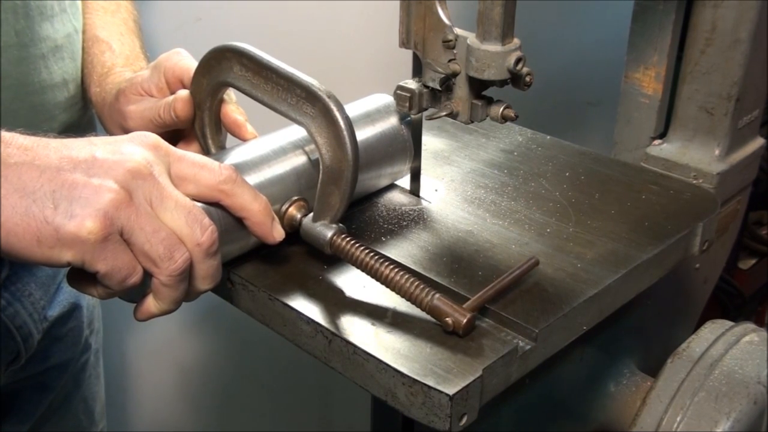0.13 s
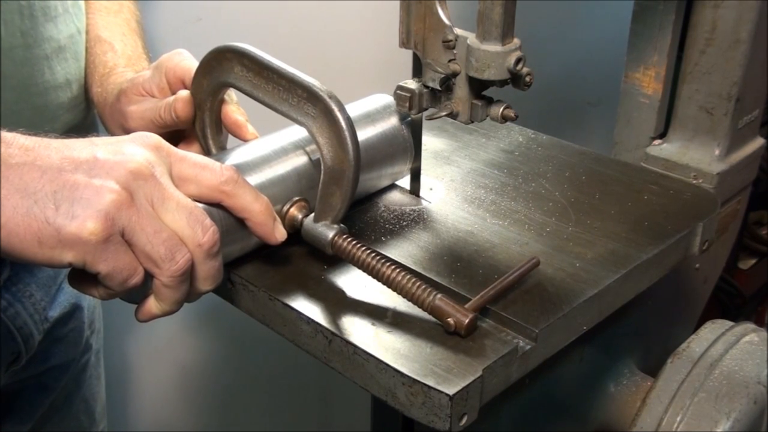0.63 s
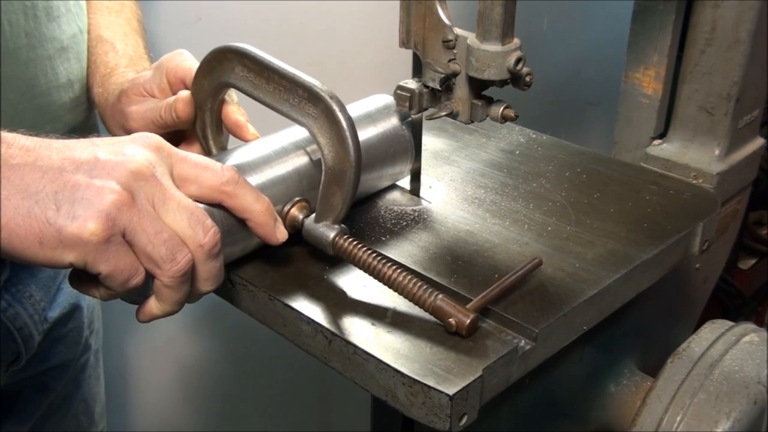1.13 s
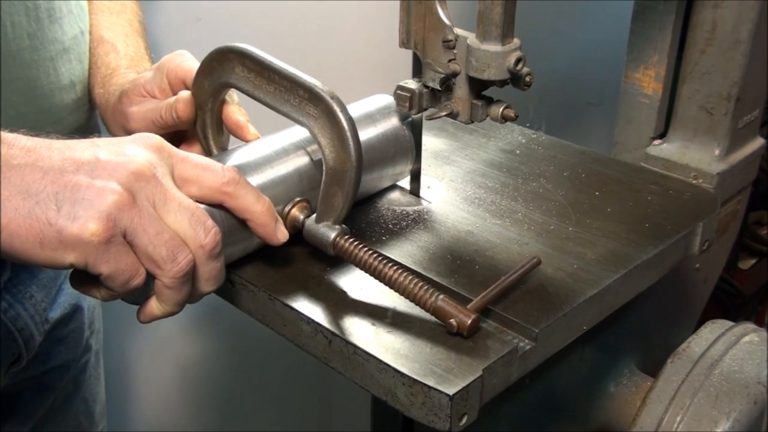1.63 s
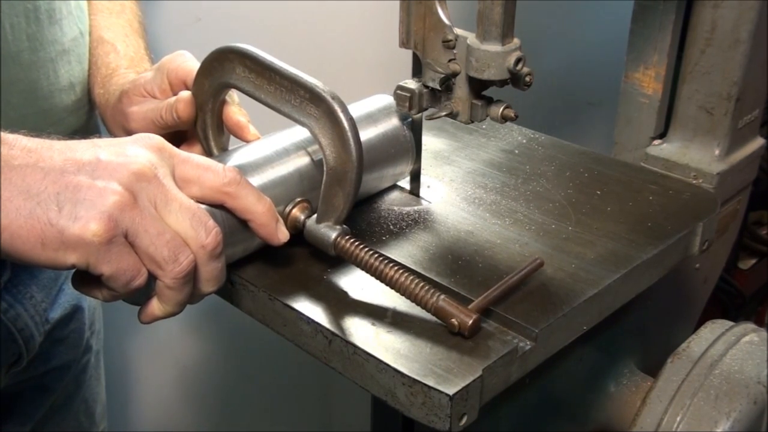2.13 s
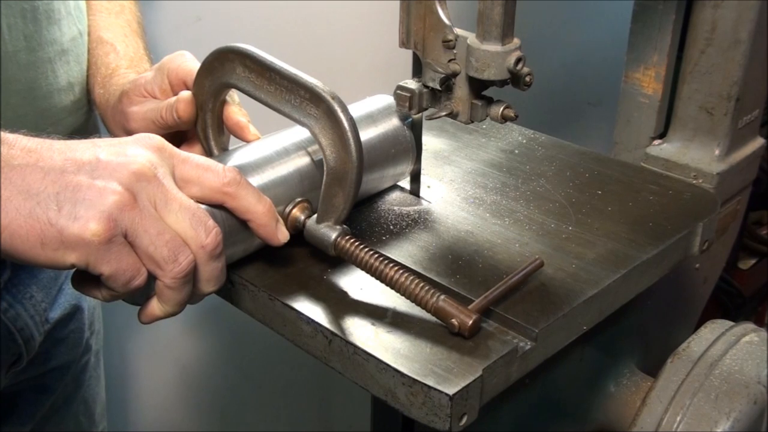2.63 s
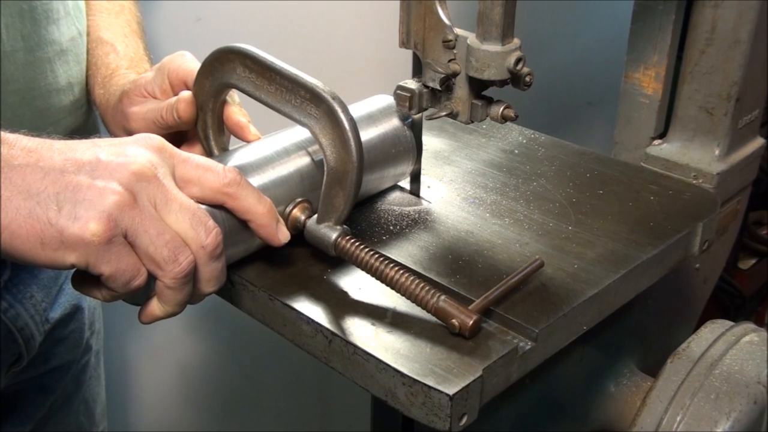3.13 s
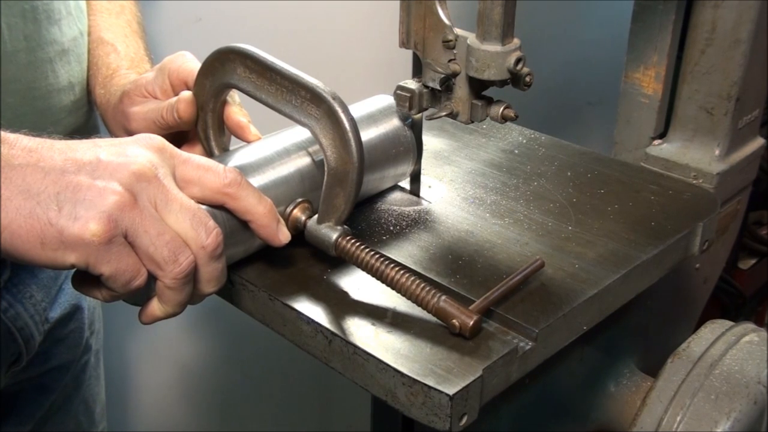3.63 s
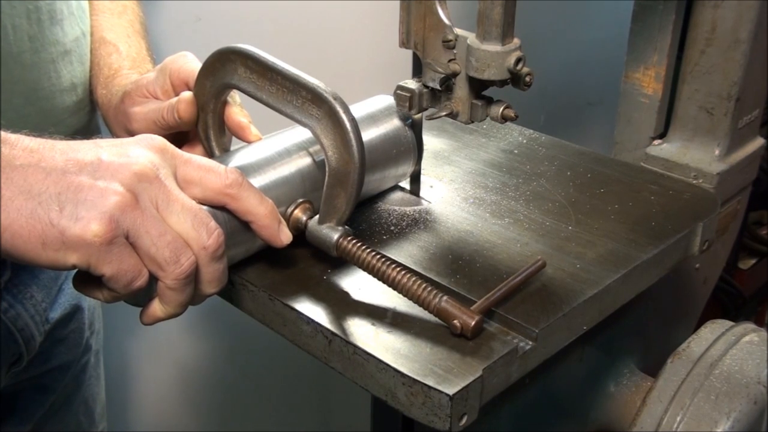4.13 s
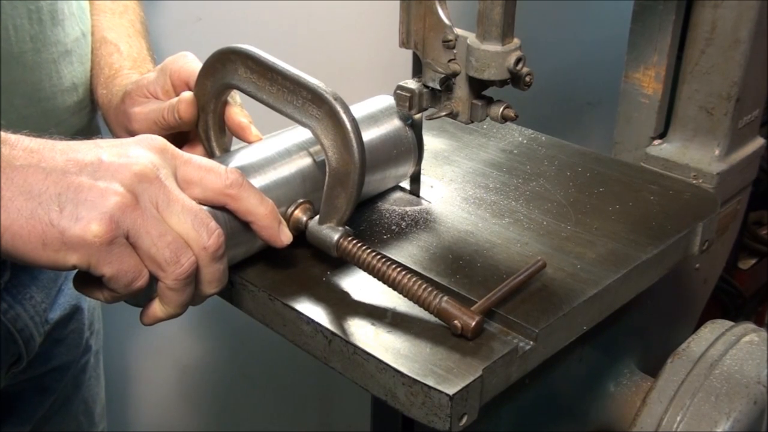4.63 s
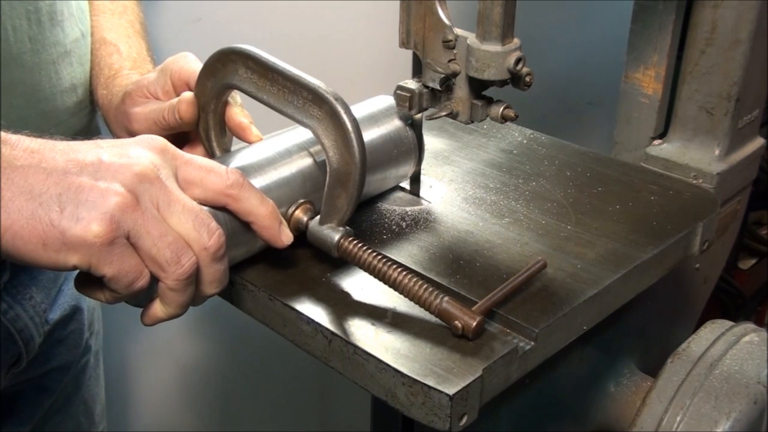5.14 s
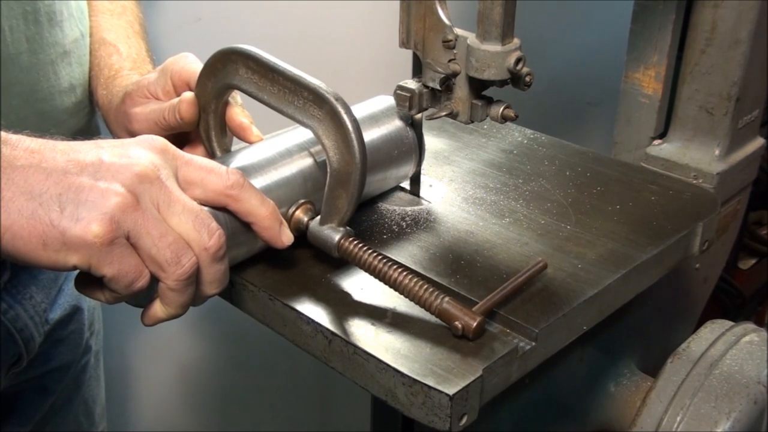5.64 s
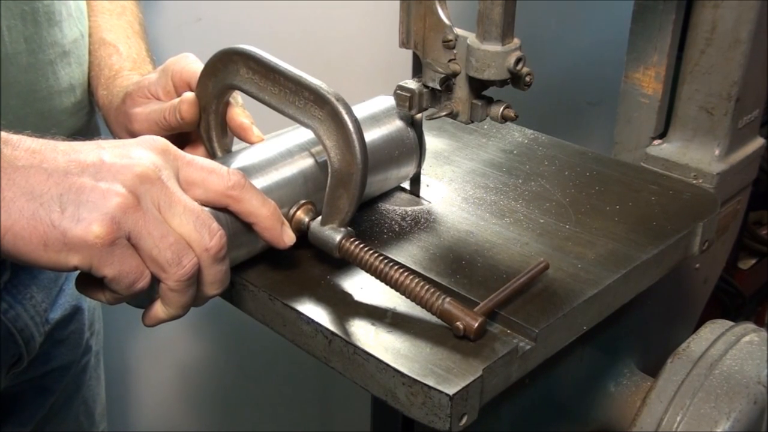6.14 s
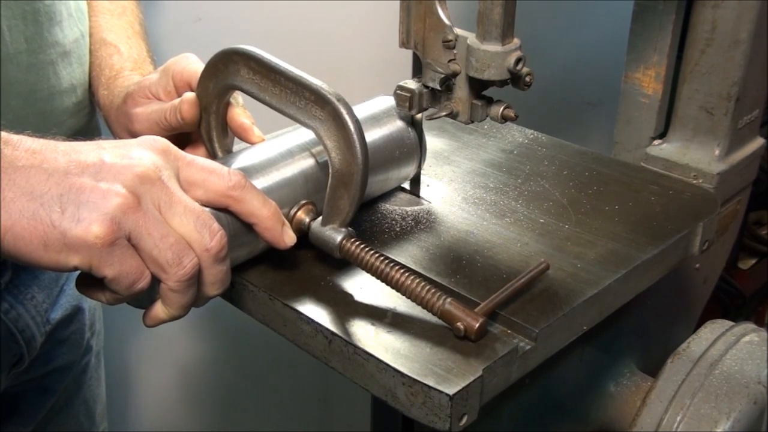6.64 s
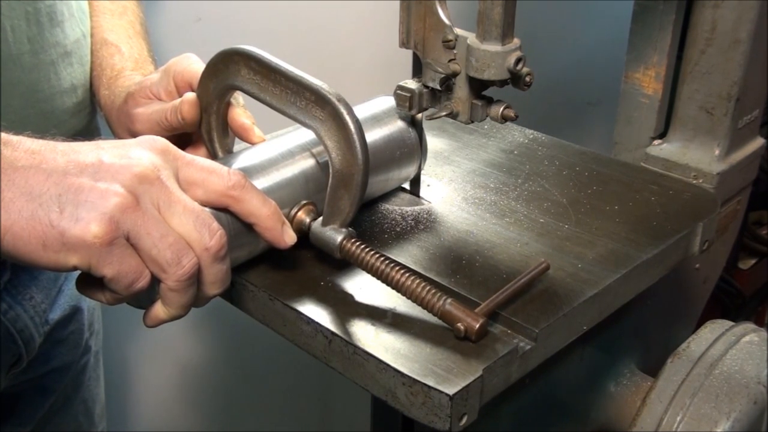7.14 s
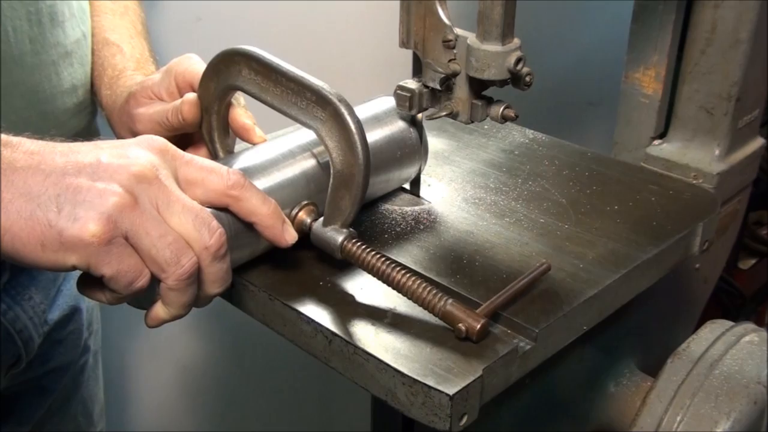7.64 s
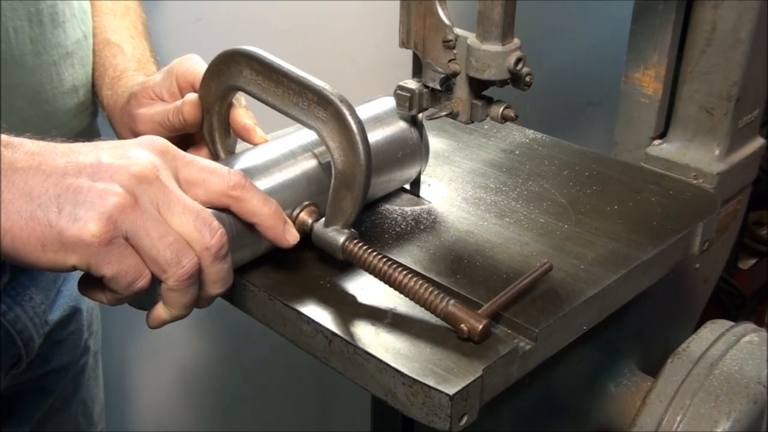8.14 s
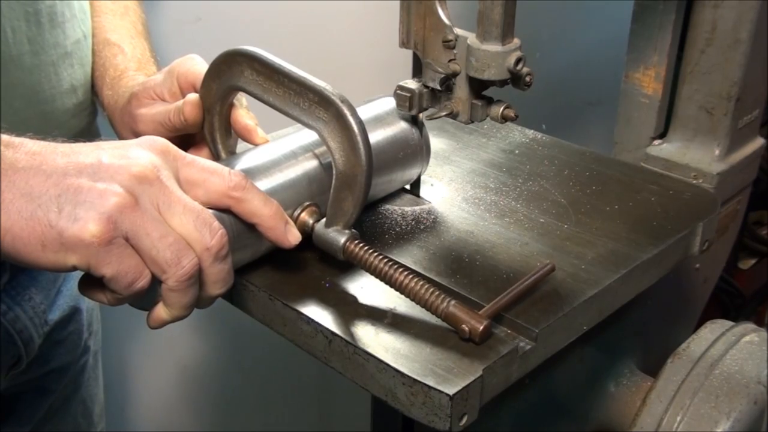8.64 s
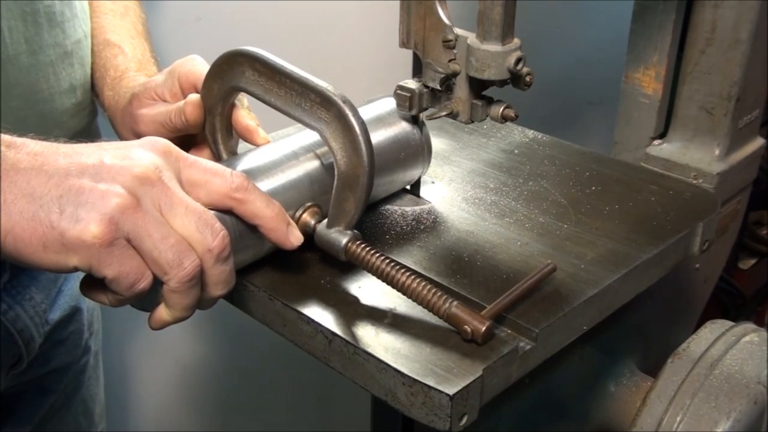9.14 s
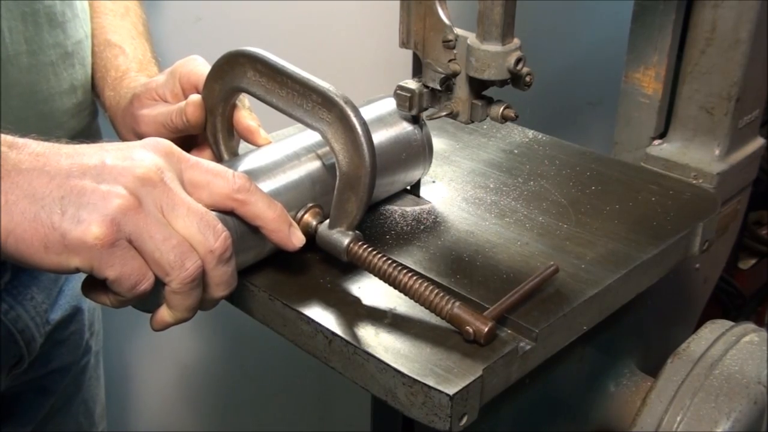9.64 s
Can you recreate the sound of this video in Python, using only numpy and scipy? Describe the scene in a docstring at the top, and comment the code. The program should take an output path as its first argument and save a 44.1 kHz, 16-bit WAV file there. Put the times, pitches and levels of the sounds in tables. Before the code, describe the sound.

Continuous harsh metal sawing: dense sizzling hiss, rapid tooth buzz and wavering metallic whistles that jump between pitches, with brief dips.

```python
"""A vertical bandsaw cuts steadily into a round metal bar held on its iron table in a workshop.
Each tooth gives a short blow and tears off hissing chips; both ring through blade, bar and table.
The blade also chatters: tones at multiples of the tooth rate whistle, squeal and screech in spells.
Echoes spread the saw over two channels, and the motor hums faintly below."""
import sys
import numpy as np
from scipy import signal
from scipy.fft import rfft, irfft
from scipy.io import wavfile
from scipy.ndimage import uniform_filter1d, map_coordinates

SR = 44100
rng = np.random.default_rng(int(sys.argv[2]) if len(sys.argv) > 2 else 0)


def convert_level_to_amplitude(level_db):
    """Map a level in decibels to its linear amplitude factor."""
    exponent = np.asarray(level_db, float) / 20
    return 10 ** exponent


def waveform_to_disk(signal):
    """Save audio, clipped to [-1, 1], as 16-bit WAV at the path in sys.argv[1]."""
    frames = np.transpose(np.atleast_2d(signal))
    scaled = np.clip(frames, -1, 1) * 32767
    samples = np.round(scaled).astype(np.int16)
    wavfile.write(sys.argv[1], SR, samples)


N = 431298
T = np.arange(N) / SR  # time in s
HZ = np.fft.rfftfreq(N, 1 / SR)

TOOTH_HZ, MOTOR_HZ = 357.1, 59.16  # average tooth rate; motor rate
SET_TEETH = 7  # teeth after which the bending pattern (the tooth set) repeats

# The push on the bar over time: t/s, chip hiss level/dB, how deep the teeth bite/dB
FEED_PUSH = [(0.0, -18.5, -3), (0.1, -14, 0.5), (0.35, -16.5, 0.5), (1.3, -15, 2.5), (1.8, -16.5, -4.5),
             (2.17, -15, -1), (2.5, -19, -6.5), (3.5, -18.5, -4.5), (4.05, -14, 1.5), (4.5, -17.5, -3),
             (5.1, -16, 3), (6.0, -15.5, -2), (6.5, -19.5, -5.5), (7.2, -16, 0), (8.15, -16.5, 3),
             (8.85, -17.5, 0.5), (9.3, -16.5, 2), (9.78, -16, 3.5)]


def level(x, db):
    """Scale a sound to an rms (average power) level in dB."""
    return x * convert_level_to_amplitude(db) / np.sqrt(np.mean(x ** 2))


def curves(table):
    """Join the points of each table column into a curve over time."""
    s, *columns = np.transpose(table)
    return [np.interp(T, s, column) for column in columns]


def colour(points):
    """Join (f/Hz, level/dB) points into a dB value for every frequency."""
    hz, db = np.transpose(points)
    return np.interp(np.log(HZ + 1), np.log(hz), db)


def shape(x, gain):
    """Filter a sound by a gain for every frequency."""
    return irfft(rfft(x) * gain, N)


def above(hz):
    """Share of each frequency that lies over a crossover."""
    return 1 / (1 + (hz / (HZ + 1)) ** 8)


def walk(rate):
    """Smooth random curve with a new value rate times a second; its spread is near 1."""
    coarse = T[::32]
    values = rng.standard_normal(4096)
    smooth = map_coordinates(values, [rate * coarse], order=3, mode="wrap")
    return np.interp(T, coarse, smooth)


def phase(hz):
    """Add up a frequency over time into a running phase in radians."""
    return 2 * np.pi * np.cumsum(hz) / SR


def cut(turn, eased_db):
    """Blows and chips ring the steel; hiss and bar follow the push, the heavy table rumbles on."""
    bar_hz, table_hz, sizzle_hz = 3700, 1000, 11000  # crossovers between the layers
    hiss_db, bite_db = curves(FEED_PUSH)
    # start level/dB + dB gained per s as the cut deepens + dB per dB of bite
    bar_db = -7.5 + 0.61 * T + 0.43 * bite_db
    table_db = -37 + 0.32 * T + 0.67 * bite_db
    sizzle_db = -2.2 + 0.27 * T - 0.23 * bite_db
    steel = ring(level(chips(turn), 0) + level(teeth(turn), -14.5))
    hiss = level(shape(steel, above(bar_hz)), 1.96)
    sizzle = shape(hiss, above(sizzle_hz))
    bar = level(shape(steel, above(table_hz) - above(bar_hz)), 0)
    table = level(shape(steel, 1 - above(table_hz)), 0)
    pushed = hiss + (convert_level_to_amplitude(sizzle_db) - 1) * sizzle + convert_level_to_amplitude(bar_db) * bar
    return convert_level_to_amplitude(hiss_db - eased_db) * pushed + convert_level_to_amplitude(table_db) * table


def teeth(turn):
    """One blow per tooth; the set of the teeth repeats, and each bite differs a little."""
    # Tone colour of a blow: f/Hz, relative level/dB
    blow_colour = [(200, -41), (720, -23.5), (1500, -4), (2500, -11), (4000, -18), (6000, -23), (9000, -7),
                   (14000, -52)]
    tooth = (turn // (2 * np.pi)).astype(int)
    at = np.flatnonzero(np.diff(tooth)) + 1
    bent_db = 1.7 * np.cos(2 * np.pi * tooth[at] / SET_TEETH)
    uneven_db = 2.1 * rng.standard_normal(4096)
    blows = np.zeros(N)
    blows[at] = convert_level_to_amplitude(bent_db + uneven_db[:len(at)])
    return shape(blows, convert_level_to_amplitude(colour(blow_colour)))


def chips(turn):
    """Chips tear off as noise that pulses with tooth, tooth set and motor, and flutters."""
    # Tone colour of the chip noise: f/Hz, relative level per Hz/dB
    hiss_colour = [(40, -53), (150, -33), (300, -22.5), (520, -21), (800, -21.5), (1200, -10), (2000, -5.5),
                   (2700, -8), (4000, -1), (5600, -5.5), (8500, -4.5), (11000, -9), (16000, -18)]
    pulse = 0.04 * np.cos(turn) + 0.04 * np.cos(turn / SET_TEETH)
    pulse = pulse + 0.03 * np.cos(2 * np.pi * MOTOR_HZ * T)
    flutter_db = 1.1 * walk(14) + 1.05 * walk(45) + 0.62 * walk(250)
    noise = rng.standard_normal(N) * (1 + pulse) * convert_level_to_amplitude(flutter_db)
    return shape(noise, convert_level_to_amplitude(colour(hiss_colour)))


def ring(x):
    """Resonances of blade, bar and table; each swells and fades as the grip on the bar shifts."""
    # Resonances, before their swells: f/Hz, width/Hz, peak over the hiss colour/dB
    resonances = [(420, 145, 6.5), (640.7, 28.5, 17), (924, 35, 7.5), (2340, 24, 6.5), (2459, 7.3, 8),
                  (2913, 63, 5.5), (3622, 16, 7), (3930, 57, 5), (4250, 184, 6), (4680, 42, 11.5),
                  (4895, 79, 12), (5300, 43, 9.5), (5350, 21, 12), (5700, 100, 4.5), (5900, 64, 5),
                  (6340, 310, 6), (7126, 290, 8.5), (7540, 57, 8), (7930, 46, 10), (8540, 240, 7),
                  (8750, 59, 6.5), (9350, 60, 6.5), (9880, 65, 10), (10320, 41, 4.5), (11900, 140, 8),
                  (12600, 80, 5), (13200, 100, 4)]
    out = x
    for hz, width, db in resonances:
        swell_db = 1.87 * walk(1.605) + 2.04 * walk(9)
        rung = signal.lfilter(*signal.iirpeak(hz, hz / width, SR), x)
        out = out + (convert_level_to_amplitude(db) - 1) * convert_level_to_amplitude(swell_db) * rung
    return out


def easing():
    """dB by which the push has slackened, in short dips."""
    # Short easings of the push: start t/s, length/s, depth/dB
    easings = [(2.127, 0.36, 8.5), (2.488, 0.073, 4), (3.113, 0.096, 6), (3.743, 0.16, 3), (4.695, 0.08, 1),
               (5.33, 0.1, 4), (6.214, 0.16, 3), (6.691, 0.11, 0), (6.889, 0.11, 2.5), (7.451, 0.25, 4),
               (7.793, 0.17, 5), (9.406, .13, 9)]
    skew = 1.56  # over 1: the push slackens slowly and returns fast
    eased_db = 0
    for start, length, depth_db in easings:
        progress = np.clip((T - start) / length, 0, 1)
        eased_db = eased_db + depth_db * np.sin(np.pi * progress ** skew)
    return eased_db


def spells(multiple, rest_db):
    """Level of one multiple: each spell catches fast, holds and fades, over a resting level."""
    # Spells in which the blade locks onto one multiple of the tooth rate:
    # start t/s, end t/s, multiple, first level/dB, last level/dB
    locks = [(0.05, 0.38, 14, -29, -20.5), (0.0, 0.528, 5, -16.5, -24.5), (0.056, 1.4, 4, -24, -22),
             (0.85, 1.44, 7, -30, -30), (1.444, 2.126, 4, -20.5, -17), (2.15, 2.336, 4, -18, -28),
             (2.15, 2.25, 5, -27, -33), (2.17, 2.225, 3, -40, -39), (2.455, 3.405, 12, -12.5, -14),
             (2.429, 3.657, 6, -21.5, -22.5), (3.197, 3.54, 7, -36, -46), (3.42, 3.78, 12, -13.5, -23),
             (3.84, 4.202, 5, -15, -22), (3.9, 4.433, 4, -27.5, -30), (4.2, 4.362, 6, -29, -26),
             (4.3, 5.153, 5, -17, -21.5), (4.95, 5.322, 4, -27, -33.5), (5.0, 5.9, 6, -29, -29),
             (5.29, 6.897, 5, -15.5, -17), (6.422, 6.713, 2.5, -50, -41), (6.7, 7.139, 4, -30.5, -35),
             (6.7, 7.46, 7, -35, -37.5), (6.946, 8.549, 5, -17.5, -21), (7.2, 7.395, 9, -21, -25.5),
             (7.2, 8.503, 3, -35, -31.5), (8.55, 9.78, 3, -27.5, -25), (7.454, 7.66, 6, -29, -24.5),
             (7.92, 8.04, 6, -19, -34), (8.03, 9.161, 4, -27, -29), (8.398, 9.26, 7, -33, -32),
             (8.6, 8.95, 6, -28, -26), (9.302, 9.7, 6, -23.5, -20.5), (9.514, 9.572, 12, -4, -19),
             (9.525, 9.6, 9, -18, -21), (9.7, 9.78, 5, -24, -16)]
    catch_db_per_s, fade_db_per_s = 320, 81
    db = rest_db + 0 * T
    for start, end, locked, first_db, last_db in locks:
        if abs(locked / multiple - 1) < 0.07:
            held_db = np.interp(T, [start, end], [first_db, last_db])
            catch_db = catch_db_per_s * np.maximum(start - T, 0)
            fade_db = fade_db_per_s * np.maximum(T - end, 0)
            db = np.maximum(db, held_db - catch_db - fade_db)
    return db


def chatter(turn):
    """Whistles near multiples of the tooth rate wander, tremble, and beat with tooth set and motor."""
    # One row per whistle: multiple of the tooth rate, level between spells before the bite/dB,
    # pitch wander/Hz, tremble/dB, lower sideband/dB, upper sideband/dB, octave/dB, twelfth/dB
    whistles = [(1, -42, 4.06, 4.5, -35, -7, -14.5, -33), (2.5, -58, 5.65, 9, -26, -11, -30, -30),
                (3, -42, 4.6, 4, -9, -13, -21, -16), (4, -35, 12.9, 3, -12.5, -17, -4.5, -28),
                (5, -27, 5.07, 2, -16, -4, -13, -14), (6, -35.5, 15.87, 3, -9.5, -4, -30, -25),
                (7, -40, 8, 2, -17, -14, -30, -30), (9, -29, 12.18, 3.5, -16.5, -12, -25, -30)]
    # The whistle of multiple 4 sags off the tooth rate under a hard push: t/s, f/Hz
    sag = [(0, 1445), (1.0, 1425), (1.3, 1424), (1.6, 1453), (1.8, 1393), (1.95, 1370), (2.1, 1370),
           (2.2, 1453)]
    (sag_hz,) = curves(sag)
    bite_db = curves(FEED_PUSH)[1]
    out = 0
    for multiple, rest_db, wander_hz, tremble_db, low_db, up_db, octave_db, twelfth_db in whistles:
        db = spells(multiple, rest_db + bite_db)
        swing = phase(sag_hz) if multiple == 4 else multiple * turn
        swing = swing + phase(wander_hz * walk(60))
        upper_phase = swing + turn / SET_TEETH + phase(11 * walk(35))
        upper = convert_level_to_amplitude(up_db + 3.7 * walk(9)) * np.cos(upper_phase)
        lower_phase = swing - phase(MOTOR_HZ + 6 * walk(25))
        lower = convert_level_to_amplitude(low_db + 4.7 * walk(9.9)) * np.cos(lower_phase)
        # the wider the blade swings, the harder it slaps the cut and the stronger its overtones
        slap = convert_level_to_amplitude(1.3 * (db - db.max()) + 2.5 * walk(30))
        overtones = convert_level_to_amplitude(octave_db) * np.cos(2 * swing) + convert_level_to_amplitude(twelfth_db) * np.cos(3 * swing)
        tone = level(np.cos(swing) + upper + lower, 0) + np.sqrt(2) * slap * overtones
        out = out + convert_level_to_amplitude(db + tremble_db * walk(24)) * tone
    return out


def squeal(turn):
    """A cluster of rough, quickly wavering blade tones that throb together."""
    # What rings in a squeal: multiple of the tooth rate, relative level/dB, pitch spread/Hz
    squeal_parts = [(11.82, -7, 22), (12.05, 0, 30), (12.3, -13, 20), (13.8, -11, 22), (14.03, -13, 14),
                    (15.05, -11, 12), (18.05, -11, 40), (20.2, -17, 30), (24.15, -12, 60)]
    db = spells(12, -60)
    throb_db = 3.6 * walk(60) + 0.43 * walk(16)
    cluster = 0
    for multiple, part_db, spread_hz in squeal_parts:
        swing = multiple * turn + phase(spread_hz * walk(160))
        cluster = cluster + convert_level_to_amplitude(part_db + 2.8 * walk(40)) * np.cos(swing)
    return convert_level_to_amplitude(db + throb_db) * level(cluster, 0)


def screech(turn):
    """One broad, fast-wavering blade tone around 14 times the tooth rate."""
    db = spells(14, -60) + 3.0 * walk(59)
    return np.sqrt(2) * convert_level_to_amplitude(db) * np.cos(14 * turn + phase(70 * walk(140)))


def workshop(saw):
    """The saw leans a little right, reaches the two channels out of step, and echoes around it."""
    # Left-right difference under the middle: f/Hz, level/dB
    side_colour = [(60, -30), (110, -39), (200, -32), (380, -17), (700, -17.5), (1290, -12.5), (2380, -10),
                   (4400, -12.5), (8120, -11.5), (15000, -19)]
    # Left minus right: f/Hz, level/dB
    lean_colour = [(60, 0), (110, 0), (200, 0.5), (380, 0.2), (700, -0.5), (1290, -1.8), (2380, -1),
                   (4400, -1.0), (8120, -1.5), (15000, 0.5)]
    echoes = rng.standard_normal(N) * np.exp(-np.log(1000) * T / 0.58)  # falls 60 dB in 0.58 s
    echoes = echoes / np.sqrt(np.sum(echoes ** 2))
    apart = -0.7j + 0.46 * rfft(echoes)  # -j shifts every frequency by a quarter cycle
    side = shape(saw, apart * convert_level_to_amplitude(colour(side_colour)))
    lean = convert_level_to_amplitude(colour(lean_colour) / 2)
    return np.array([shape(saw, lean) + side, shape(saw, 1 / lean) - side])


def motor():
    """Faint hum of steady sine tones whose levels waver slowly."""
    # Hum tones, before the waver: f/Hz, rms level/dB
    hum_tones = [(59.2, -60), (118.4, -61.5)]
    hum = 0
    for hz, db in hum_tones:
        hum = hum + np.sqrt(2) * convert_level_to_amplitude(db + 2 * walk(1.2)) * np.sin(2 * np.pi * hz * T)
    return hum


def scene():
    """The running blade drives cut and tones together; the motor hums equally in both channels."""
    turn = phase(TOOTH_HZ + 0.8 * walk(3) + 1.542 * walk(30))  # one full turn per tooth
    eased_db = easing()
    # whistles and squeal sink with every short easing: dB lost per dB of easing
    whistling = convert_level_to_amplitude(-0.51 * eased_db) * chatter(turn)
    squealing = convert_level_to_amplitude(-1.04 * eased_db) * squeal(turn)
    saw = cut(turn, eased_db) + whistling + squealing + screech(turn)
    return workshop(saw) + motor()


def band_limit(x):
    """A steep low-pass at the top of the band."""
    return signal.sosfilt(signal.butter(12, 15960, fs=SR, output="sos"), x)


def record(dry):
    """A limiter holds loud swells down, the input rounds peaks, the microphone cuts both extremes."""
    power = uniform_filter1d(np.mean(dry ** 2, axis=0), int(0.011 * SR))  # averaged over 11 ms
    held = dry * np.minimum(1, convert_level_to_amplitude(-11.5) / np.sqrt(power + 1e-12)) ** 0.7
    rounded = 1.536 * np.tanh(held * convert_level_to_amplitude(0.37) / 1.495)
    no_bass = signal.butter(2, 40, "high", fs=SR, output="sos")
    no_top = signal.ellip(10, 0.3, 60, 15780, fs=SR, output="sos")
    heard = signal.sosfilt(no_top, signal.sosfilt(no_bass, rounded))
    return band_limit(np.clip(heard, -1, 1))


dry = scene()
out = record(dry)
waveform_to_disk(out)
```